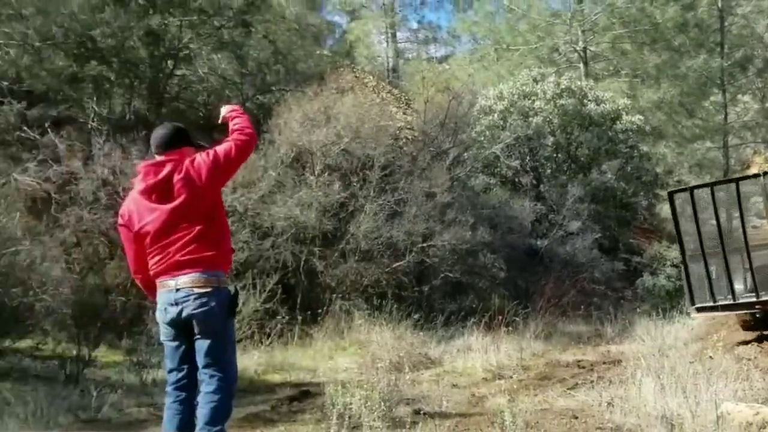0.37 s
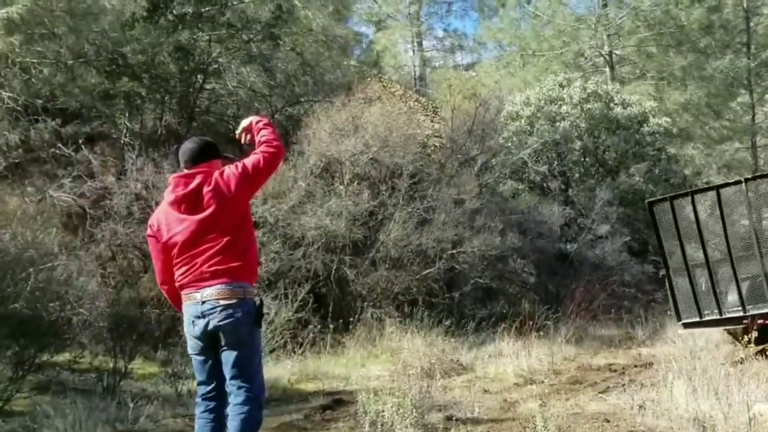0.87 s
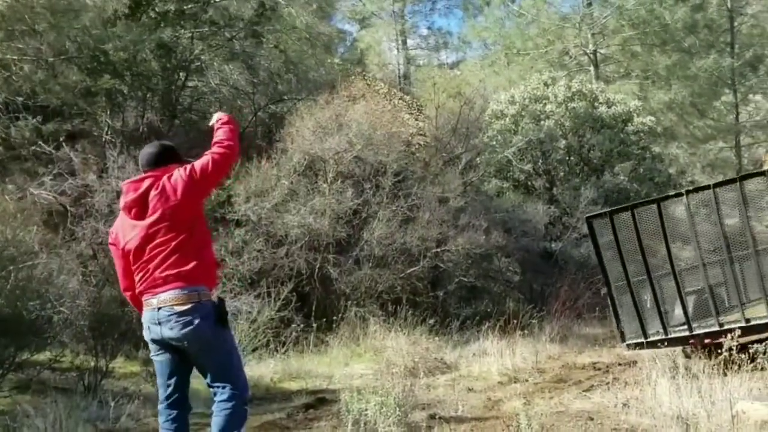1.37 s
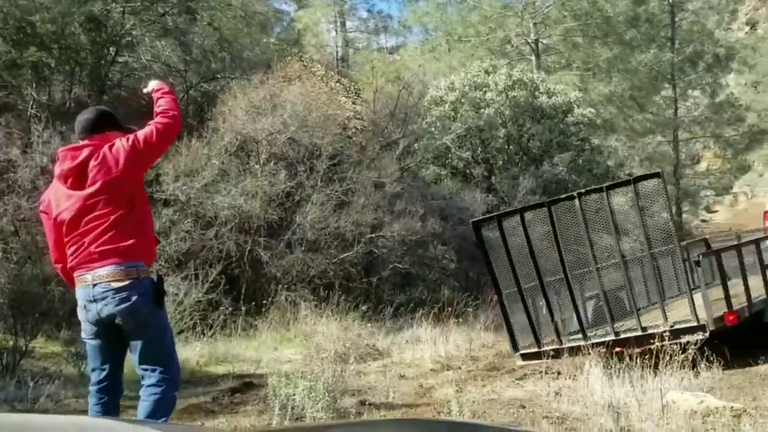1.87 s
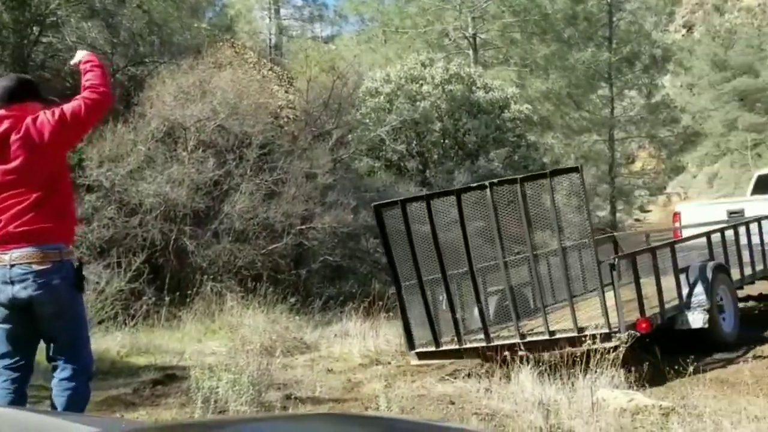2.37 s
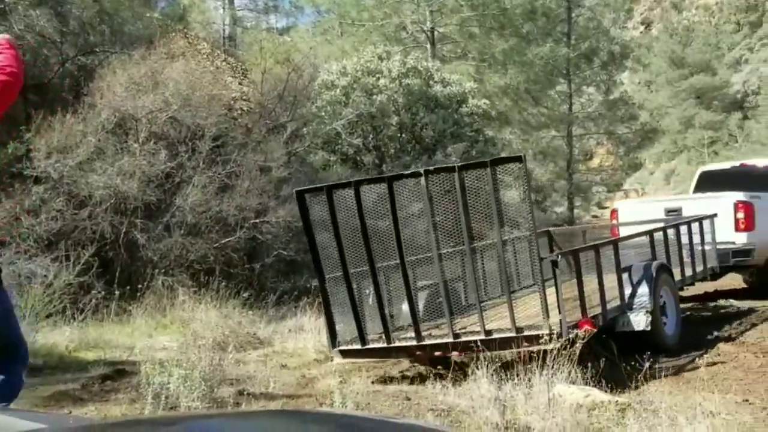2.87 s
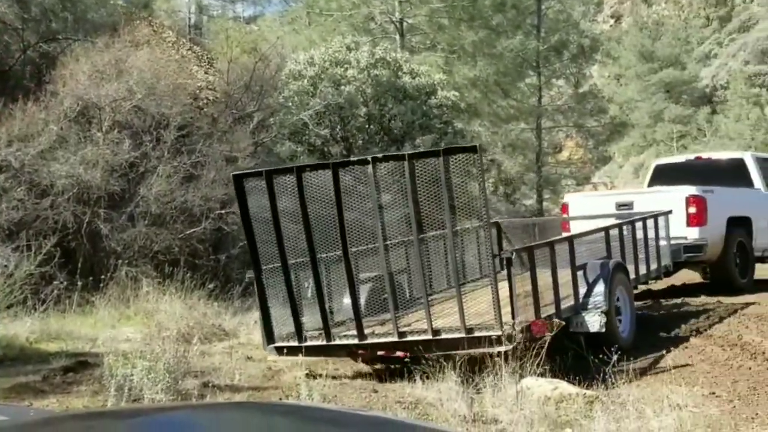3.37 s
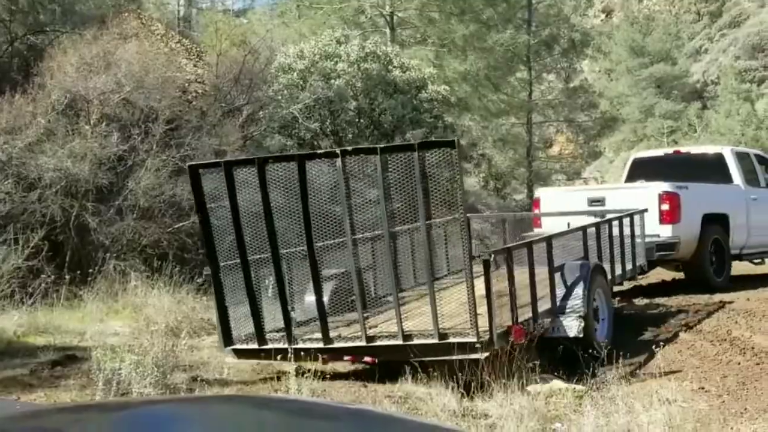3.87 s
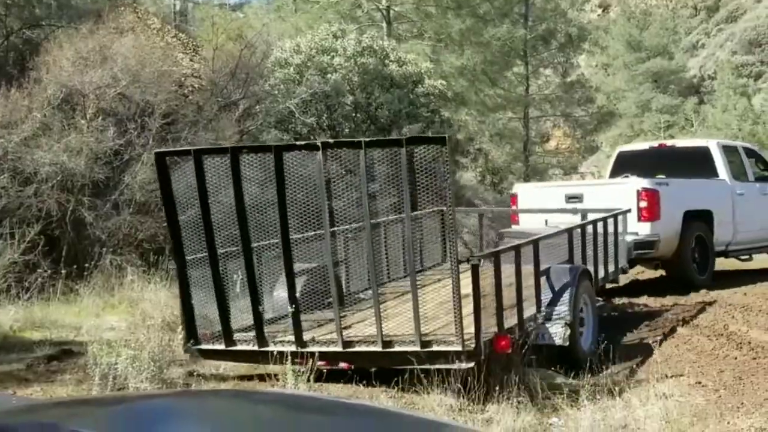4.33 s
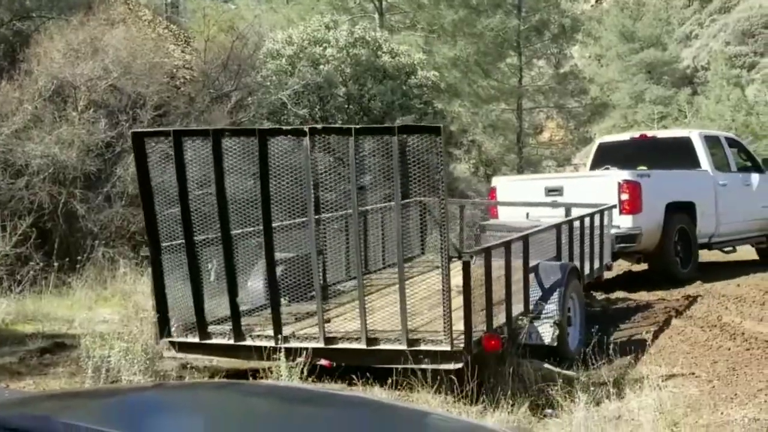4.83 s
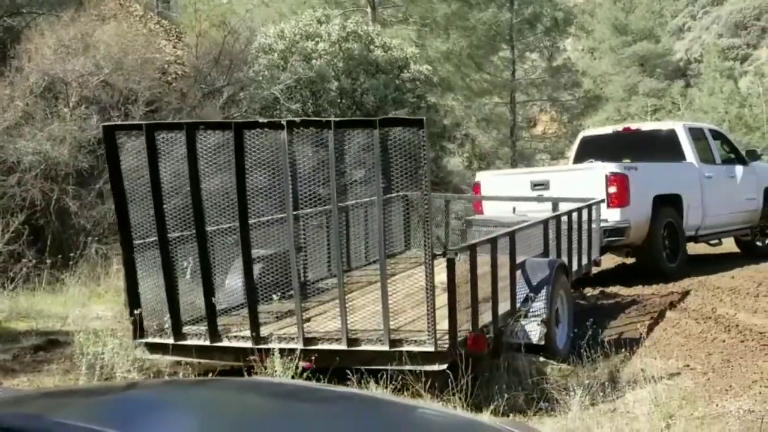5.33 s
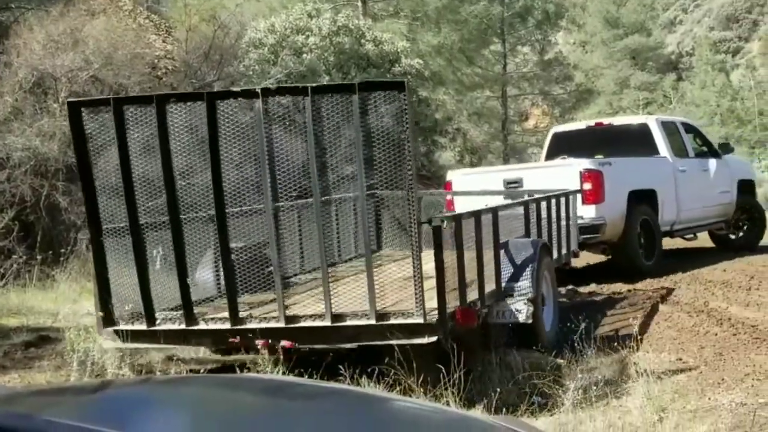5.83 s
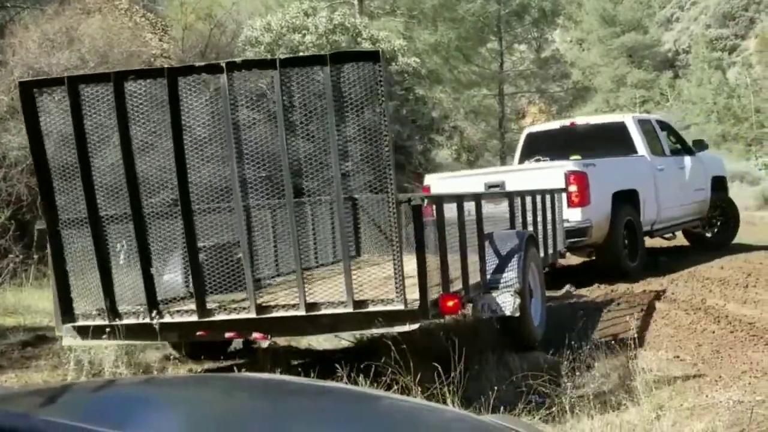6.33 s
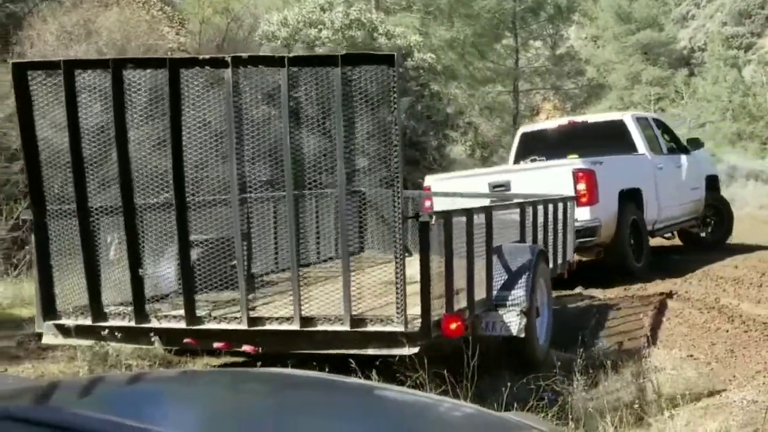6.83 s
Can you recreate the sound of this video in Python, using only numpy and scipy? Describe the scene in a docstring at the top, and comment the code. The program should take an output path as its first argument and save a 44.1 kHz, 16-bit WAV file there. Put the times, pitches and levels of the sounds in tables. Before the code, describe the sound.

A two-cylinder off-road engine idles right beside the microphone outdoors, a deep uneven throb with metallic valve clatter, airy fan and intake roar and a thin pump whine. Early on there is a soft rustle and two dull bumps; a sharper snap comes just after two seconds. The idle stumbles slightly after four seconds, and faint rustles and one bump come near the end.

```python
"""From start to end a two-cylinder off-road engine idles close by, outdoors. Uneven firings, about ten cycles a
second, excite exhaust resonances; valve gear rings metal, a pump whines, and fan and intake roar as shaped noise.
Early come a rustle of tiny grains and two bumps of filtered noise; near 1.3 s a snap and a faint squeaking tone;
past 2 s a rustle and a run of resonant noise snaps. Some burns are weak throughout; near misses begin after 4 s.
Sparse snaps go on, and rustles return after 5.7 s, with a last bump near 6.3 s."""
import sys
import numpy as np
from scipy import signal
from scipy.io import wavfile

SR = 44100
rng = np.random.default_rng(int(sys.argv[2]) if len(sys.argv) > 2 else 0)


def transcribe(u):
    """Save the signal u as a 16-bit wav file named by the first command-line argument.

    u: samples, shape (n,) or (channels, n), limited to [-1, 1]; the rate is SR.
    q: integer samples, one column per channel.
    """
    v = np.clip(np.atleast_2d(u).T, -1, 1)
    q = np.round(v * 32767).astype(np.int16)
    wavfile.write(sys.argv[1], SR, q)


def ratio_of_db(decibels):
    """Turn decibels (scalar or array-like) into linear amplitude factors; 0 dB maps to 1."""
    return 10 ** (np.asarray(decibels, float) / 20)


N = 306627

# roar spectrum: pitch_hz, relative_density_db
ROAR_SPECTRUM = [(170, -6.5), (250, -20), (350, -11), (480, -16), (600, -20.5), (700, -23), (1000, -19.5),
                 (1600, -24), (2390, -28), (3470, -39), (7030, -48), (8500, -72), (11600, -49.5),
                 (14500, -54)]
# correlation of the roar on the two sides: pitch_hz, likeness (0 to 1)
STEREO_LIKENESS = [(60, 0.98), (130, 0), (290, 0.94), (620, 0.49), (1360, 0.018), (2960, 0.012),
                   (6460, 0.0), (14100, 0.02)]
# balance of the roar: pitch_hz, left_over_right_db
STEREO_LEANING = [(60, 2.0), (130, -1), (290, -1.5), (620, 1.0), (1360, -3.5), (2960, -2.5), (6460, 4),
                  (14100, -2.5)]
# bodywork resonances that colour the roar: pitch_hz, width_hz, added_gain (ratio)
BODYWORK_MODES = [(576, 37, 1.0), (864, 72, 0.3), (921, 32, 0.42), (1300, 54, 0.46), (1458, 84, 0.45),
                  (1690, 46, 0.91), (2340, 1100, 0.14)]
# dry rustles nearby: start_s, hold_s, relative_level_db, centre_hz
RUSTLE_EVENTS = [(0.076, .36, -40, 1050), (2.234, 0.32, -47.5, 2810), (5.74, 0.23, -41.5, 1203),
                 (6.271, 0.12, -46.5, 2166), (6.788, .2, -45, 1800)]
# dull bumps nearby: start_s, relative_level_db, centre_hz
BUMP_EVENTS = [(.206, -14, 934), (.413, -19.5, 920), (6.258, -21, 1820)]
# one faint squeak: centre_s, pitch_hz, length_s (between 1/e points), mean_level_db
SQUEAK_EVENT = (1.272, 3850, .035, -49)
# small snaps nearby: start_s, relative_level_db
SNAP_EVENTS = [(1.2592, -45), (2.199, -26.5), (2.206, -36.5), (2.28, -44), (2.4965, -38.5), (2.817, -42.5),
               (3.974, -43), (4.368, -43.5), (5.936, -44), (6.323, -43.5)]
# resonances that colour a snap: pitch_hz, width_hz, relative_level_db
SNAP_MODES = [(3850, 580, -1), (4630, 550, 2.5), (8850, 730, -7), (6230, 3800, -11), (12000, 4000, -19)]
# electric pump partials: pitch_hz, relative_level_db
PUMP_PARTIALS = [(352.7, -43), (507, -49.5), (1058, -48), (1763, -63)]
# valve gear thumps in each cycle: position_cycles, relative_level_db, scatter_db
VALVE_THUMPS = [(.752, -29, 1.5), (.832, -28, 1.5)]
# engine case rung by the thumps: pitch_hz, relative_level_db, t60_s, right_over_left (ratio)
CASE_MODES = [(322, -10, 0.061, 0.35), (362, -3, 0.076, 0.83), (426, -2, 0.049, 0.58),
              (442, 0.5, 0.1, 0.43), (510, -6, 0.021, 0.2)]
# lighter valve gear taps in each cycle: position_cycles, relative_level_db, scatter_db
VALVE_TAPS = [(0.261, -43, 2.4), (0.311, -40.5, 2.8)]
# cover rung by the taps: pitch_hz, relative_level_db, t60_s, right_over_left (ratio)
COVER_MODES = [(690, -3.5, 0.029, -0.89), (856, -1.5, 0.055, 0.7), (1790, -1, .09, -1.3)]
# tappet ticks in each cycle: position_cycles, relative_level_db, scatter_db
TAPPET_TICKS = [(.2, -54, 2.5), (0.577, -57.5, 3)]
# crank speed: time_s, speed_cycles_per_s
CRANK_SPEED = [(0.0, 9.78), (0.45, 10.501), (0.87, 10.518), (1.22, 9.891), (1.47, 10.501), (1.84, 10.224),
               (2.09, 10.961), (2.25, 10.126), (2.64, 9.953), (3.6, 10.604), (4.39, 10.119), (4.51, 9.753),
               (4.94, 10.812), (5.35, 10.257), (5.49, 10.593), (5.79, 10.073), (6.04, 10.5), (6.96, 9.96)]
# weak burns and misses of either cylinder: time_s, burnt_share (of a full push)
WEAK_BURNS = [(.024, .78), (.163, .25), (.225, .78), (.647, .8), (.838, .83), (1.188, .78), (1.289, .75),
              (1.617, .83), (2.188, .8), (2.645, .78), (2.846, .81), (4.135, .5), (4.195, .8), (4.331, .03),
              (4.531, .45), (5.491, .03), (5.682, .62), (5.977, .03), (6.167, .62), (6.361, .55),
              (6.812, .77), (6.914, .73)]
# exhaust resonances: pitch_hz, width_hz, front_height, rear_height (relative, per unit push)
EXHAUST_MODES = [(43.0, 17.0, 0.21, 0.11), (66.5, 35.9, -0.85, -0.23), (114.3, 15.3, 1.89, -2.73),
                 (119.5, 25.0, -1.8, 3.55), (134.7, 24.9, 0.45, -1.1), (186.9, 20.1, 0.07, -0.07)]

RISE_DB_PER_S, TREBLE_RISE_DB_PER_S = 0.2, 0.3  # slow growth of the roar
RUSTLE_ATTACK_DB_PER_S, RUSTLE_RELEASE_DB_PER_S = 89, 100
RUSTLE_SPREAD_DB = 5.5  # loss an octave off centre
START_TURN, REAR_TURN = -.2326, .403  # cycles: crank at the start; rear firing after the front one
IDLE_PER_S = 10.3  # cycles per second at which the rear push has its plain value
FRONT_PUSH, REAR_PUSH, REAR_LOSS_PER_SPEED = 1.01, 1.1, .62  # rear push grows as the crank sags
BURN_SCATTER_DB, BURN_JITTER_S = .5, .0004  # standard deviations
LATE_S, LATE_SHARE = .0155, .33  # delayed pop of the unburnt share


def rms_one(x):
    """Normalization: the mean square is brought to one."""
    return x / np.sqrt(np.mean(x ** 2) + 1e-20)


def at_hz(points, hz):
    """Spectral interpolation along a logarithmic frequency axis."""
    table_hz, value = np.array(points).T
    return np.interp(np.log(hz), np.log(table_hz), value)


def drift(rate_hz):
    """Low-pass random process: twice-smoothed noise of unit spread, made at a fortieth of the sample rate."""
    r = np.exp(-80 * np.pi * rate_hz / SR)
    slow = signal.lfilter([1], [1, -2 * r, r * r], rng.standard_normal(N // 40 + 2002))
    slow = rms_one(slow[2000:])  # past the filter's settling
    return np.interp(np.arange(N) / 40, np.arange(len(slow)), slow)


def filtered(x, order, hz, kind="low"):
    """Linear filtering: a Butterworth response with the given edges."""
    return signal.sosfilt(signal.butter(order, hz, kind, fs=SR, output="sos"), x)


def ring(clicks, hz, width_hz):
    """Damped resonance: a unit impulse starts a decaying sine of initial height one."""
    r, w = np.exp(-np.pi * width_hz / SR), 2 * np.pi * hz / SR
    return signal.lfilter([0, np.sin(w)], [1, -2 * r * np.cos(w), r * r], clicks + 1e-18)


def puffs(clicks, t60_s):
    """Exponential decay: each click opens a burst of stereo noise that dies away."""
    envelope = signal.lfilter([1], [1, -ratio_of_db(-60 / (t60_s * SR))], clicks + 1e-18)
    return envelope * rng.standard_normal((2, N))


def passes(turns, position):
    """Phase crossing: samples at which the crank passes a position in its cycle."""
    return np.flatnonzero(np.diff(np.floor(turns - position)) > 0)


def strikes(turns, contacts):
    """Periodic impact: clicks locked to crank phase, each of random strength."""
    clicks = np.zeros(N)
    for position, db, scatter_db in contacts:
        at = passes(turns, position)
        clicks[at] = ratio_of_db(db + scatter_db * rng.standard_normal(len(at)))
    return clicks


def struck(turns, contacts, modes):
    """Modal superposition: the same contact times excite every mode, with strengths of its own."""
    out = 0
    for hz, db, t60_s, right in modes:
        width_hz = np.log(1000) / np.pi / t60_s
        mode = ratio_of_db(db) * ring(strikes(turns, contacts), hz, width_hz)
        out = out + mode * [[1], [right]]
    return out


def roar(turns):
    """Broadband flow noise: third-octave stereo bands flicker, and the treble swells with the engine cycle."""
    from_middle_s = (np.arange(N) - N / 2) / SR
    together = drift(6.0)
    edges = 160 * 2 ** np.arange(0, 6.7, 1 / 3)
    white = rng.standard_normal((2, 2, N))
    swell, late_swell = np.cos(2 * np.pi * (turns - .8)), np.cos(2 * np.pi * (turns - .45))
    out = 0
    for k, (low, high) in enumerate(zip(edges, edges[1:])):
        # alternate noises keep neighbouring bands independent
        mid, side = filtered(white[k % 2], 2, [low, high], "band")
        hz = np.sqrt(low * high)
        treble = np.clip(np.log2(hz / 1700.0), 0, 1)
        high_up = np.clip(np.log2(hz / 3700.0), 0, 1)
        rise_db = ((1 - treble) * RISE_DB_PER_S + treble * TREBLE_RISE_DB_PER_S) * from_middle_s
        cycle_db = 1.0 * treble * swell + 2.0 * high_up * late_swell
        flicker_db = (0.088 + 1.1 * high_up) * together + 0.97 * drift(13.0)
        gain = ratio_of_db(at_hz(ROAR_SPECTRUM, hz) + rise_db + cycle_db + flicker_db)
        alike = np.clip(at_hz(STEREO_LIKENESS, hz), 0, 1)
        stereo = np.sqrt(1 + alike) * mid + np.sqrt(1 - alike) * side * [[1], [-1]]
        lean = ratio_of_db(at_hz(STEREO_LEANING, hz) / 2 * np.array([[1], [-1]]))
        out = out + gain * lean * stereo
    coloured = out
    for hz, width_hz, gain in BODYWORK_MODES:
        # the slope of a ring is in step with its drive
        slope = np.gradient(ring(out, hz, width_hz), axis=1) * SR / (2 * np.pi * hz)
        coloured = coloured + gain * 2 * np.pi * width_hz / SR * slope
    return ratio_of_db(-31.5) * rms_one(coloured)


def rustle():
    """Granular excitation: clumped grains of uneven size ring briefly, independently on the two sides."""
    born = rng.random((2, N)) < 1500.0 * ratio_of_db(5.0 * drift(25.0)) / SR
    sizes = ratio_of_db(3.8 * np.minimum(rng.exponential(1, (2, N)), 4))
    grains = born * sizes * rng.choice([-1, 1], (2, N))
    dealt = rng.integers(0, 10, (2, N))  # the pitch each grain takes
    start_s, hold_s, db, centre_hz = np.transpose(RUSTLE_EVENTS)[..., None]
    t = np.arange(N) / SR - start_s
    attack_db = RUSTLE_ATTACK_DB_PER_S * np.maximum(-t, 0)
    release_db = RUSTLE_RELEASE_DB_PER_S * np.maximum(t - hold_s, 0)
    shapes = ratio_of_db(db - attack_db - release_db)
    out = 0
    for k, hz in enumerate(np.geomspace(700.0, 3600.0, 10)):
        rung = ring(ring(grains * (dealt == k), hz, .4 * hz), hz, .4 * hz)
        weight = ratio_of_db(-RUSTLE_SPREAD_DB * np.log2(hz / centre_hz) ** 2)
        out = out + rms_one(rung) / 2 * (shapes * weight).sum(axis=0)
    return out


def bumps():
    """Band-limited impact: a short puff of noise through one broad band, steep on both sides."""
    out = 0
    for s, db, hz in BUMP_EVENTS:
        click = ratio_of_db(db) * (np.arange(N) == round(s * SR))
        out = out + filtered(puffs(click, 0.053), 2, [hz / 1.4, hz * 1.4], "band")
    return out


def squeak():
    """Modulated oscillation: one Gaussian-edged tone of unsteady level and phase."""
    s, hz, length_s, db = SQUEAK_EVENT
    t = np.arange(N) / SR - s
    envelope = ratio_of_db(db + 3 * drift(60)) * np.exp(-(2 * t / length_s) ** 2)
    return envelope * np.sin(2 * np.pi * hz * t + .8 * drift(60))


def snaps():
    """Resonant filtering: short noise bursts with a fading tail excite broad resonances."""
    clicks = np.zeros(N)
    for s, db in SNAP_EVENTS:
        clicks[round(s * SR)] = ratio_of_db(db)
    burst = puffs(clicks, 0.023) + ratio_of_db(-12) * puffs(clicks, 0.13)
    rung = 0
    for hz, width_hz, db in SNAP_MODES:
        rung = rung + ratio_of_db(db - 4.5) * np.sqrt(width_hz / SR) * ring(burst, hz, width_hz) * 2
    return filtered(rung, 4, 3300.0, "high")


def pump():
    """Additive synthesis: motor partials share a wavering speed, and each wavers in level."""
    motor_s = np.cumsum(1 + .002 * drift(2.7)) / SR
    out = 0
    for hz, db in PUMP_PARTIALS:
        out = out + np.sqrt(2) * ratio_of_db(db + 2.0 * drift(17.0)) * np.sin(2 * np.pi * hz * motor_s)
    return out


def valves(turns):
    """Impact excitation: thumps and taps ring case and cover; tappets tick as short bright puffs."""
    ticks = puffs(strikes(turns, TAPPET_TICKS), 0.0098)
    ticks = filtered(ticks, 1, [10000.0, 13500.0], "band") * ratio_of_db(13.5)
    return struck(turns, VALVE_THUMPS, CASE_MODES) + struck(turns, VALVE_TAPS, COVER_MODES) + ticks


def exhaust(speed, turns):
    """Pipe resonance: firings push the modes of the exhaust; unsteady flow keeps them murmuring."""
    early = np.arange(-SR // 10, 0)  # the engine already runs, so its last firings still ring
    turns = np.r_[turns[0] + speed[0] * early / SR, turns]
    speed = np.r_[speed[0] + 0 * early, speed]
    front, rear = passes(turns, 0), passes(turns, REAR_TURN)
    fired = np.r_[front, rear]
    cylinder = (np.arange(len(fired)) >= len(front)) * 1  # 0 front, 1 rear

    scatter, jitter = rng.standard_normal((len(fired), 2)).T
    rear_strength = REAR_PUSH - REAR_LOSS_PER_SPEED * (speed[rear] - IDLE_PER_S)
    strength = np.r_[FRONT_PUSH + 0 * front, rear_strength] * ratio_of_db(BURN_SCATTER_DB * scatter)
    burnt = np.ones(len(fired))
    for s, share in WEAK_BURNS:
        burnt[np.argmin(abs(fired - len(early) - s * SR))] = share  # the nearest firing

    last = len(turns) - 1
    fired = np.clip(fired + (BURN_JITTER_S * SR * jitter).astype(int), 0, last)
    push = np.zeros((2, len(turns)))
    push[cylinder, fired] = strength * burnt
    # what a cylinder leaves unburnt pops in the pipe a little later
    late = np.minimum(fired + round(LATE_S * SR), last)
    push[cylinder, late] += LATE_SHARE * (1 - burnt)

    flow = filtered(ratio_of_db(-56.5) * rng.standard_normal(len(turns)), 1, 80.0, "high")
    boom = 0
    for hz, width_hz, front_height, rear_height in EXHAUST_MODES:
        drive = front_height * push[0] + rear_height * push[1] + flow
        boom = boom + ring(drive, hz, width_hz)
    return filtered(boom, 2, 160)[len(early):]  # softens the pushes


def scene():
    """Superposition: exhaust, valve gear and roar follow one crank angle, and the other sources add."""
    time_s, cycles_per_s = np.transpose(CRANK_SPEED)
    speed = np.interp(np.arange(N) / SR, time_s, cycles_per_s)
    turns = START_TURN + np.cumsum(speed) / SR
    background = roar(turns) + rustle() + bumps() + squeak() + snaps()
    near = (pump() + exhaust(speed, turns)) * np.array([[ratio_of_db(.95)], [ratio_of_db(-1.05)]])  # leans left
    return background + valves(turns) + near


def roll_off(x):
    """The treble ends steeply here."""
    return signal.sosfilt(signal.butter(12, 14600, fs=SR, output="sos"), x)


def record(dry):
    """Transducer limits: the microphone drops the lowest bass and rounds the highest peaks."""
    heard = filtered(dry, 2, 20.0, "high")
    heard = heard / (1 + abs(heard / .98) ** 8) ** (1 / 8)
    return roll_off(heard)


dry = scene()
out = record(dry)
transcribe(out)
```